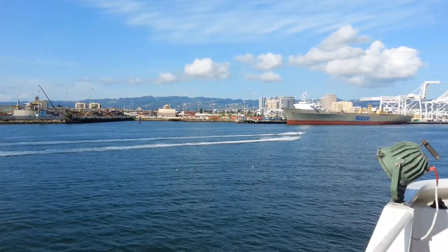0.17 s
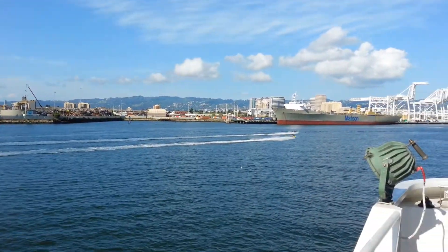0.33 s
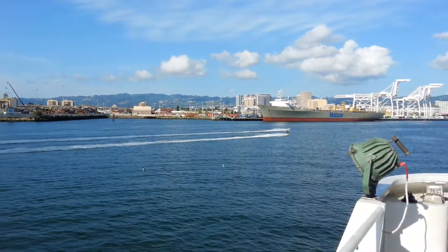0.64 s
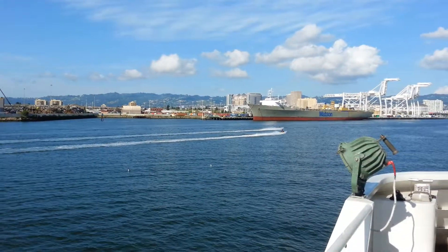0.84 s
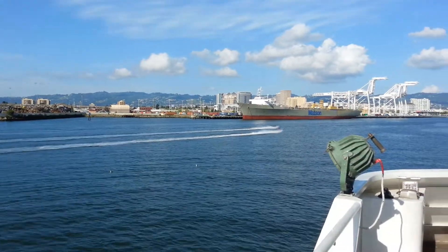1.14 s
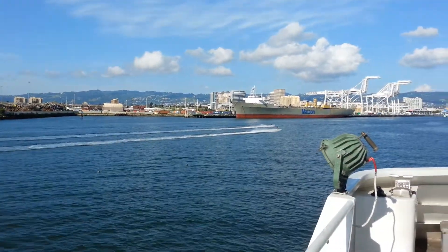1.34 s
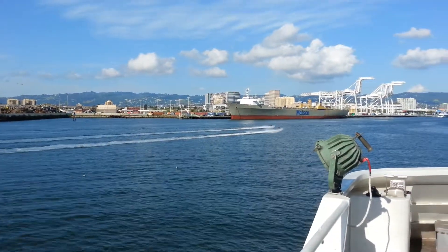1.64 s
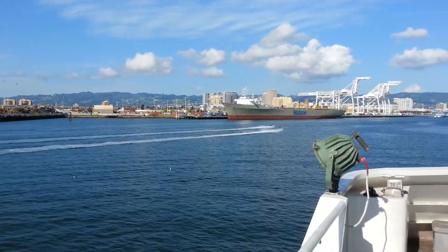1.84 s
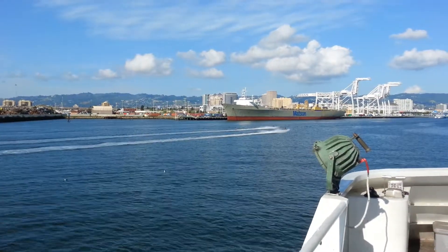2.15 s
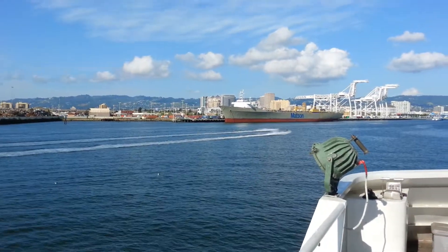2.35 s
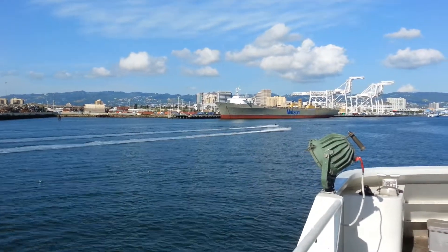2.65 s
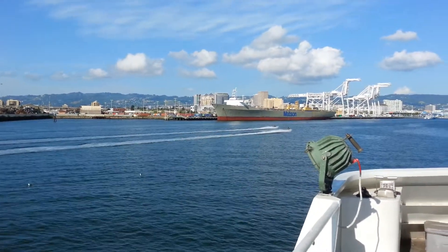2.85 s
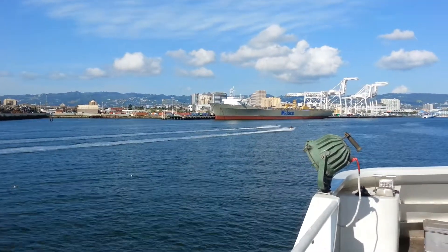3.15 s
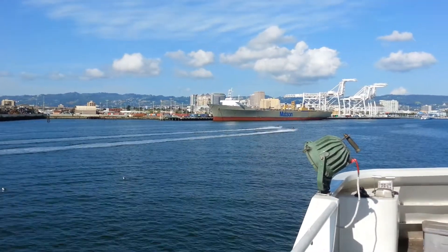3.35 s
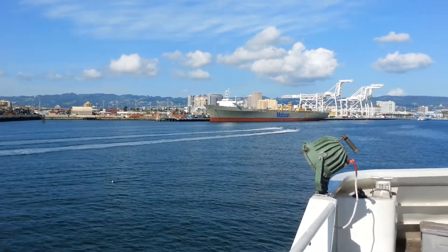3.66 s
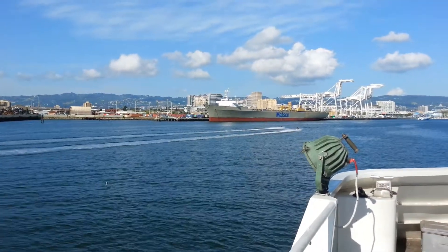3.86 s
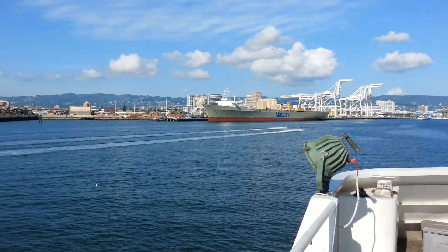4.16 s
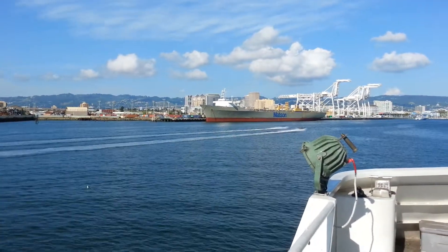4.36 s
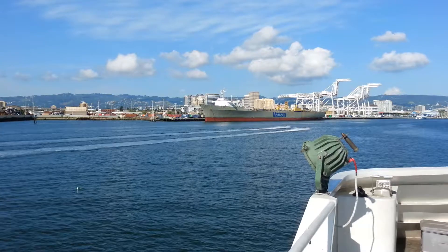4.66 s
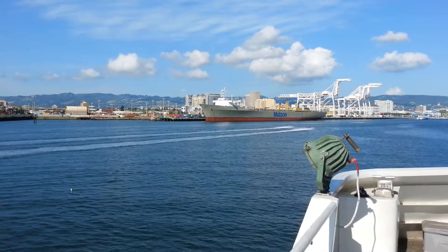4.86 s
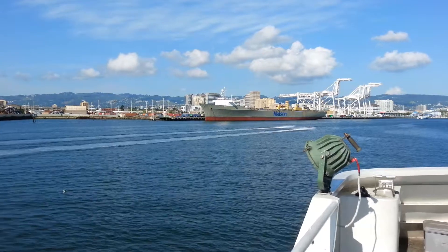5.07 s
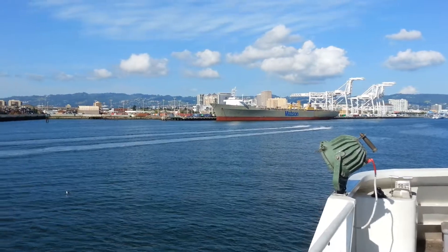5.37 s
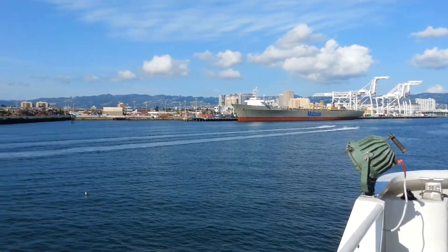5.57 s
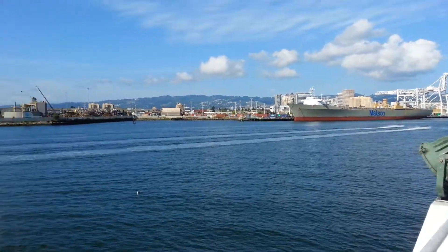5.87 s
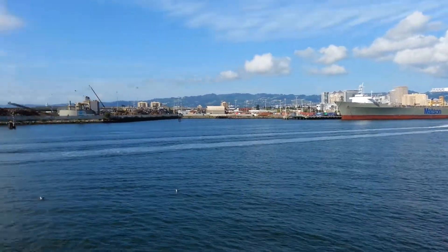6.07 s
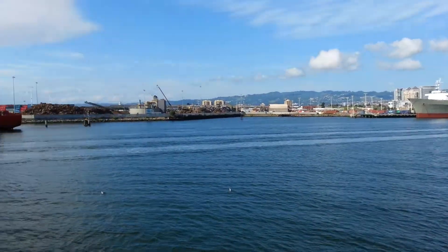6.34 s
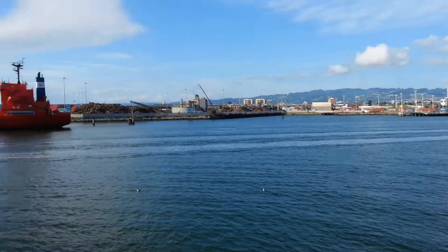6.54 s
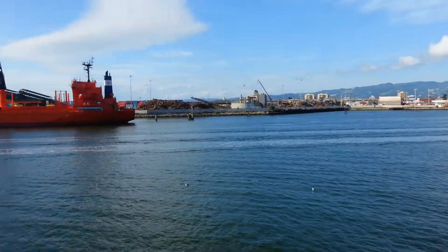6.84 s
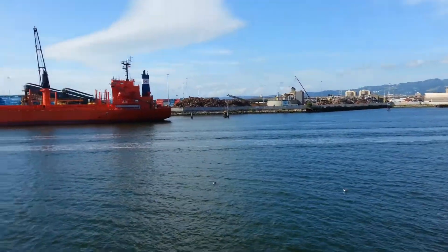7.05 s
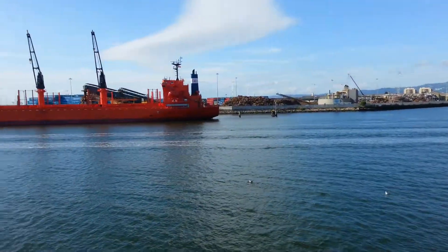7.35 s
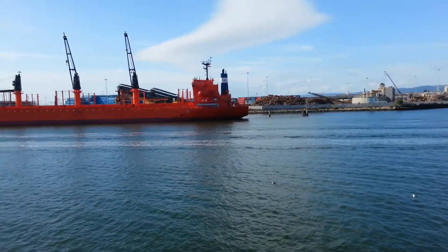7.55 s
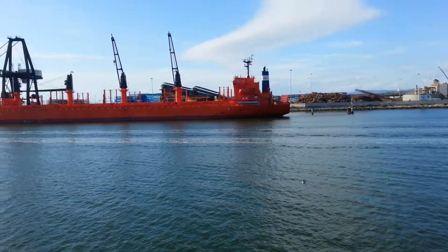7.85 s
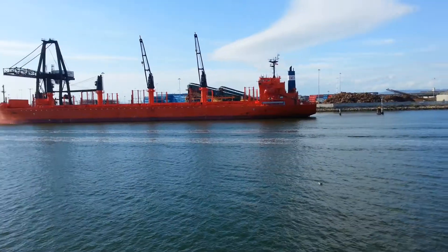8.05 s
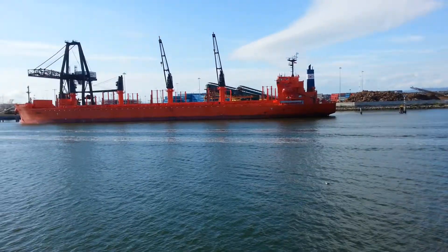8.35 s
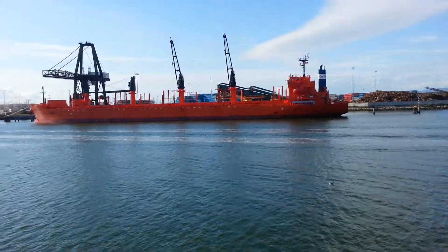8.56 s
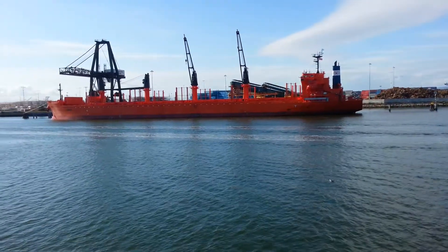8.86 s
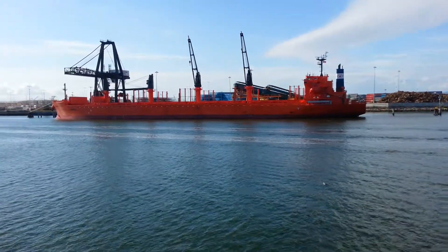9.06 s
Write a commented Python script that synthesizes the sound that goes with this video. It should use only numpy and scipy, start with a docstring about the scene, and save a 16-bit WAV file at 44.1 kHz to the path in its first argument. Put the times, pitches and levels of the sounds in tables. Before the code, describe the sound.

Throughout about nine seconds, a ferry's diesels and generator hold a deep, steady hum that beats and throbs, wrapped in low wind and exhaust roar, with a barely audible thin whine. Bow wash runs mostly on the left, gently rolling; a wave breaks from 0.7 to 2.8 s, with hollow, sliding rushes of churning water densest around 1.3 to 2 s. Softer surges follow near 4.5 and 6.3 s. On the right, foam fizzes finely, with small spits around 2.6, 3.4 to 3.8, 4.7 to 5 and 7.3 s. Isolated bright spray ticks fall close on the right, the clearest at 7.5 s. From 6 to 8 s the stereo microphone swings, swelling the hum and recolouring the water. Thin, raspy, buzzing squeals push out on the left at 7.4 and 8 s, each sagging quickly. A faint distant bird gives one short falling peep at 8.8 s.

```python
"""Open deck of a moving ferry: two diesels and a generator, as combs of sines, beat in a low throb.
Shaped noise makes the roar of wind and exhaust, the bow wash with a few waves on the left, and hollow rushes.
Random bursts and noise make foam fizz on the right; filtered ticks make single drops of spray.
Late on the microphone swings round and the hum grows; thin buzzing partials squeal and a far bird peeps."""
import sys
import numpy as np
from scipy import signal
from scipy.fft import rfft, irfft, next_fast_len
from scipy.io import wavfile
from scipy.ndimage import uniform_filter1d

SR = 44100
rng = np.random.default_rng(int(sys.argv[2]) if len(sys.argv) > 2 else 0)


def to_wav(sig):
    """Store sig (one row per channel, or 1-D mono) as 16-bit WAV at the path in sys.argv[1].

    Samples outside -1..1 are clipped; the rate is SR.
    """
    pcm = np.clip(np.atleast_2d(sig), -1, 1) * 32767
    pcm = np.round(pcm).astype(np.int16)
    wavfile.write(sys.argv[1], SR, pcm.T)  # frames by channels


N = 406161
TIME = np.arange(N) / SR


def diesel(orders, cycle_hz, level_db, drift, waver_db, boom_db=7.0, boom_hz=123, boom_width_hz=9,
           left_db=0.3, smear_cycles=0.27):
    """Unequal cylinders repeat once a working cycle: a comb of lines, which the wind makes waver."""
    cycles = cycle_hz * np.cumsum(1 + drift * wander(0.718)) / SR + rng.random()
    turn = turned()
    out = np.zeros((2, N))
    for order, db in orders:
        hz = order * cycle_hz
        # the swing carries the microphone into a standing wave of the deck
        near_boom = np.exp(-((hz - boom_hz) / boom_width_hz) ** 2)
        boost_db = boom_db * (turn - turn.mean()) * near_boom
        gain = amp(level_db + db + boost_db + waver_db * wander(1.475))
        # the hull smears each thud
        phase = 2 * np.pi * (order * cycles + smear_cycles * rng.standard_normal())
        # reflections part the two sides
        skew = np.arccos(np.clip(read(LIKENESS, hz), -1, 1)) * rng.normal(1.0, 0.87)
        out += gain * np.array([np.sin(phase), np.sin(phase + skew)])
    return np.sqrt(2) * out * amp([[left_db], [-left_db]])  # sine peak to rms


# engine lines: (multiple of the working cycle, relative level [dB])
MAIN_ORDERS = [(6, -49), (9, -41), (10, -41), (11, -43), (13, -34), (14, -35), (15, -31), (16, -43),
               (17, -39), (18, -26), (19, -40), (20, -49), (21, -33), (22, -44), (24, -39), (25, -41),
               (26, -37), (27, -47), (28, -54), (30, -53), (44, -53), (49, -57), (50, -56), (51, -56),
               (54, -47), (57, -58), (81, -62), (96, -60)]
SECOND_ORDERS = [(6, -51), (9, -36), (11, -45), (12, -33), (14, -39), (15, -38), (18, -38), (19, -39),
                 (20, -38), (21, -35), (22, -48), (23, -45), (24, -36), (25, -47), (29, -50), (30, -50),
                 (33, -38), (34, -52), (38, -52), (46, -53), (52, -50)]
GENERATOR_ORDERS = [(4, -43), (5, -48), (8, -33), (9, -39), (12, -40), (14, -49), (24, -51), (25, -46),
                    (26, -49), (27, -54), (28, -51), (29, -57), (30, -59), (31, -59), (32, -54), (33, -55),
                    (34, -59), (35, -58), (36, -52), (38, -61), (39, -58), (40, -62), (47, -63), (49, -62),
                    (52, -63), (60, -63)]
MAIN_HZ, SECOND_HZ, GENERATOR_HZ = 7.2098, 5.5268, 15.1202  # working cycles


def engines():
    """Three machines at unrelated speeds beat together."""
    out = diesel(MAIN_ORDERS, MAIN_HZ, level_db=0.1, drift=.0004, waver_db=.5, smear_cycles=.16)
    out += diesel(SECOND_ORDERS, SECOND_HZ, level_db=0.4, drift=.0003, waver_db=.7)
    out += diesel(GENERATOR_ORDERS, GENERATOR_HZ, level_db=1.3, drift=.0003, waver_db=.6)
    return out


# a faint whine, then a very faint high tone: (frequency [Hz], left level [dB rms], right level [dB rms])
FAINT_TONES = [(2509, -62, -72), (13160, -100, -74)]


def faint_tones():
    """Two sines of constant level and slightly wandering pitch: a faint whine and a very faint high tone."""
    out = np.zeros((2, N))
    for hz, left_db, right_db in FAINT_TONES:
        cycles = np.cumsum(hz * (1 + 0.0026 * wander(12))) / SR
        out += amp([[left_db], [right_db]]) * np.sqrt(2) * np.sin(2 * np.pi * cycles)
    return out


# roar colour before the swing: (frequency [Hz], left density [dB/Hz], right density [dB/Hz])
ROAR_COLOUR = [(15, -92, -91), (35, -83, -77), (80, -57, -52), (115, -56, -55), (130, -45.5, -50),
               (143, -54, -59), (157, -48, -58), (170, -56.5, -59), (201, -54.5, -58.5), (280, -58, -59),
               (358, -58.5, -61.5), (466, -64.5, -68), (780, -66, -65.5), (948, -69, -71),
               (1310, -79.5, -75.5), (3000, -105, -105), (9000, -140, -140)]


def roar():
    """Wind and exhaust turbulence: low coloured noise, slightly patchy."""
    return rush(ROAR_COLOUR, patchy_db=0.5)


# colours before swells and swing: (frequency [Hz], left density [dB/Hz], right density [dB/Hz])
WASH_COLOUR = [(100, -110, -110), (400, -91, -75), (900, -75.5, -76.5), (1310, -69.5, -73.5),
               (1590, -70, -72.5), (2040, -70, -75.5), (2480, -73, -82), (3200, -77, -87), (3850, -81, -92),
               (5170, -85.5, -100), (6200, -93, -98), (9000, -110, -110), (14000, -130, -130)]
SURGE_COLOUR = [(60, -100, -100), (150, -76, -82), (284, -51.5, -52.5), (410, -62, -68), (696, -61.5, -67),
                (895, -75, -79), (1270, -68.5, -68.5), (1520, -59.5, -71), (1900, -70, -65),
                (2200, -65, -74), (2680, -78, -81), (3560, -79, -90), (5000, -96, -100), (9000, -135, -135)]
HISS_COLOUR = [(1980, -115, -125), (2660, -75, -98), (3020, -70, -92), (3350, -75.5, -93), (4070, -83, -88),
               (5500, -105, -110), (9000, -140, -140)]
# waves breaking off the bow: (start [s], length [s], crest gain [dB])
WAVES = [(.68, 2.14, 0.5), (1.31, 0.18, -2), (4.3, 2.3, -15.5), (6.17, 0.71, -5.5), (7.0, 1.3, -17)]
# spells of narrow hiss: (start [s], length [s], crest gain [dB])
HISSES = [(-1.04, 4.25, -1), (-1, 2.1, -6), (3.5, 1.8, -8), (5.5, 4, -7)]
# the wash rises and falls with the slow roll of the boat
WASH_DB, ROLL_DB, ROLL_PERIOD_S, ROLL_CREST_S = -0.48, 0.44, 2.76, 5.04


def water():
    """Coloured noise: gently rolling bow wash, breaking waves, and a narrow hiss."""
    roll = np.cos(2 * np.pi * (TIME - ROLL_CREST_S) / ROLL_PERIOD_S)
    wash = rush(WASH_COLOUR, patchy_db=1.1) * amp(WASH_DB + ROLL_DB * roll)
    waves = rush(SURGE_COLOUR, patchy_db=1.4) * swells(WAVES)
    hiss = rush(HISS_COLOUR, patchy_db=2.0) * swells(HISSES)
    return wash + waves + hiss


# hollow rushes: (start [s], length [s], first frequency [Hz], last frequency [Hz], width [Hz],
#                 left level before swell [dB rms], right level before swell [dB rms])
HOLLOWS = [(.36, .24, 3480, 3530, 500, -46, -60), (.86, 0.28, 3290, 3390, 700, -42, -56),
           (.92, 0.176, 1380, 1450, 400, -38, -50), (1.3, .7, 1565, 1620, 620, -35.5, -49),
           (1.22, .8, 1088, 1030, 230, -40, -45), (1.3, .85, 3043, 3293, 800, -44.5, -59),
           (2.6, 1.3, 3200, 3350, 600, -51, -62), (1.38, 0.118, 1700, 1893, 1400, -34, -38),
           (1.97, 0.1, 1484, 1570, 260, -34, -48), (1.3, .6, 2367, 2280, 330, -39.5, -46),
           (1.35, 0.14, 3150, 3310, 900, -45, -54), (1.35, 1.3, 799.5, 719, 350, -42, -44),
           (2.2, 0.53, 1463, 1440, 180, -47, -56), (2.6, 1.4, 782, 873, 280, -44, -49),
           (4.57, 0.274, 2177, 2244, 450, -40, -48), (5.3, 1.7, 4510, 4760, 900, -52.5, -57),
           (5.4, 1.14, 2050, 2216, 600, -45, -51), (6.25, 0.45, 2160, 2320, 800, -48.5, -54),
           (6.52, 0.19, 1594, 1645, 400, -40, -54), (7.2, 1.6, 1682, 1800, 500, -48, -51)]


def churn():
    """Churning water: hollow rushes of noise in sliding resonances."""
    return gliding_bands(HOLLOWS)


# colours before level and swing: (frequency [Hz], left density [dB/Hz], right density [dB/Hz])
FIZZ_COLOUR = [(2500, -115, -105), (4500, -104, -91), (6280, -99, -84), (7690, -99.5, -78.5),
               (8900, -104, -86), (11430, -109, -93.5), (13000, -116, -100), (14200, -118, -100)]
SPIT_COLOUR = [(3500, -120, -110), (5500, -108, -93), (6730, -101, -84.5), (7500, -101, -83.5),
               (9000, -107, -95), (12000, -116, -100), (14200, -125, -112)]
# sheets of foam beside the hull: (start [s], length [s], crest level re steady fizz [dB], added as power)
FOAM_SHEETS = [(-.4, 2.6, -2), (3.25, 1.7, -1), (4.5, 1.1, -1), (5.65, 1.27, 0.5), (7.0, 1.8, -3),
               (8.0, 2.2, -7)]
# clumps of bubbles bursting together: (middle [s], relative level [dB])
SPITS = [(2.64, 4), (3.39, 7), (3.47, 9), (3.8, 9), (4.69, 8), (4.78, 5), (4.97, 3), (7.22, 5), (7.37, 6)]
FIZZ_DB, SPIT_S = -3, 0.026


def foam(bursts_per_s=230, burst_db=-8, flicker_db=0.58):
    """Countless tiny bubbles fizz, more with each sheet of foam; nearer ones burst as ticks and spits."""
    sizes = amp(3.2 * np.minimum(rng.exponential(1, (2, N)), 3.2))
    signs = rng.choice([-1, 1], (2, N))
    happens = rng.random((2, N)) < bursts_per_s / SR
    bursts = evened(sizes * signs * happens)
    ticks = amp(burst_db) * np.sqrt(SR / 2) * tinted(bursts, FIZZ_COLOUR)
    fizz = rush(FIZZ_COLOUR, patchy_db=0.9) + ticks
    sheets = fizz * np.sqrt(1 + swells(FOAM_SHEETS) ** 2)
    spit_power = sum(amp(db) ** 2 * np.exp(-((TIME - s) / SPIT_S) ** 2) for s, db in SPITS)
    spits = rush(SPIT_COLOUR, patchy_db=3.0) * np.sqrt(spit_power)
    return (sheets + spits) * amp(FIZZ_DB + flicker_db * wander(20))


# the squeal's two pushes: (start [s], length [s], delay from one partial to the next [s])
SQUEALS = [(7.38, .28, 0), (8.0, .47, .02)]
# left partials before sag: (multiple of the pitch, first push level [dB rms], second push level [dB rms])
SQUEAL_PARTIALS = [(12, -48.5, -46.5), (13, -45.5, -42.5), (14, -54, -44), (15, -50, -52), (16, -58, -52),
                   (17, -63, -55), (18, -70, -59)]
# rasp bands: (start [s], length [s], first frequency [Hz], last frequency [Hz], width [Hz],
#              left level before swell [dB rms], right level before swell [dB rms])
SQUEAL_RASP = [(7.1, 1.55, 3550, 3680, 750, -46.3, -57), (7.65, .95, 4250, 4400, 900, -52, -58),
               (7.64, .34, 3470, 3470, 40, -47.5, -58), (7.62, .5, 3720, 3650, 400, -48, -59),
               (7.86, .34, 3380, 3500, 170, -41, -52), (7.92, .25, 3180, 3225, 90, -45.5, -56),
               (7.97, .1, 2600, 2400, 250, -43, -54)]
SQUEAL_HZ = 266.9
SQUEAL_ATTACK_S, SQUEAL_RELEASE_S, SQUEAL_SAG_DB_PER_S = .07, .05, 17


def squeal(jitter=.0012, waver_db=1.8, rough=.4, rough_hz=34, right_db=-11):
    """High partials of a near-steady pitch start fast, sag and flutter over a dry noise rasp."""
    cycles = np.cumsum(SQUEAL_HZ * (1 + jitter * wander(18))) / SR
    slow = signal.butter(2, rough_hz, fs=SR, output="sos")
    buzz = np.zeros(N)
    for rank, (multiple, *levels) in enumerate(SQUEAL_PARTIALS):
        gain = np.zeros(N)
        for (start, length, delay), db in zip(SQUEALS, levels):
            age = np.clip(TIME - start - rank * delay, 0, length)
            attack = np.minimum(age / SQUEAL_ATTACK_S, 1)
            release = np.clip((start + length - TIME) / SQUEAL_RELEASE_S, 0, 1)
            gain += attack * release * amp(db - SQUEAL_SAG_DB_PER_S * age)
        # slow noise in phase and in quadrature roughens the partial
        along, across = rough * evened(signal.sosfilt(slow, rng.standard_normal((2, N))))
        phase = 2 * np.pi * (multiple * cycles + rng.random())
        partial = (1 + along) * np.sin(phase) + across * np.cos(phase)
        buzz += gain * evened(amp(waver_db * wander(12)) * partial)
    return buzz * amp([[0], [right_db]]) + gliding_bands(SQUEAL_RASP)


# drops of spray: (time [s], relative peak level [dB])
DROPS = [(1.7574, -32), (2.9856, -28.5), (5.2057, -26), (6.1549, -30), (7.0943, -30), (7.5022, -15.5)]


def spray(level_db=-.7, left_db=-15, decay_s=.0006):
    """Single drops land beside the microphone: decaying noise, band-passed to a very short bright tick."""
    t = np.arange(400) / SR
    out = np.zeros(N)
    bright = signal.butter(4, [7000, 14500], "bandpass", fs=SR, output="sos")
    for s, db in DROPS:
        tick = signal.sosfilt(bright, rng.standard_normal(len(t)) * np.exp(-t / decay_s))
        out[round(s * SR):][:len(t)] += amp(db + level_db) * tick / abs(tick).max()
    return out * amp([[left_db], [0]])


PEEP_START_S, PEEP_LENGTH_S, PEEP_DB, PEEP_HZ, PEEP_FALL_HZ = 8.797, .105, -41, 3040, 520


def bird(right_db=-11):
    """One short sine whistle from far off, its pitch falling ever faster."""
    age = np.clip((TIME - PEEP_START_S) / PEEP_LENGTH_S, 0, 1)
    whistle = np.sin(2 * np.pi * np.cumsum(PEEP_HZ - PEEP_FALL_HZ * age ** 2) / SR)
    return evened(whistle) * np.sin(np.pi * age) ** 2 * amp(PEEP_DB) * amp([[0], [right_db]])


# (frequency [Hz], left-right likeness [0-1])
LIKENESS = [(60, 0.97), (150, 1), (300, 0.93), (630, 0.72), (1300, 0.41), (2000, 0.49), (3000, 0.0044),
            (7000, 0)]
# slanting sound reaches the left port later: (frequency [Hz], lag [rad])
PORT_LAG = [(30, 0.17), (300, 0.34), (780, 0.85), (1100, 1.7), (1460, 4.23), (1750, 4.3), (2240, 5.17)]


def rush(colour, patchy_db):
    """Two-sided noise of a given colour, with short patches of turbulence."""
    hz, _, z = signal.stft(rng.standard_normal((2, N)), SR, nperseg=2048, noverlap=1536)
    same = np.clip(read(LIKENESS, hz), -1, 1)[:, None]
    lag = np.exp(1j * read(PORT_LAG, hz))[:, None]
    z[1] = same * z[0] * lag + np.sqrt(1 - same ** 2) * z[1]
    patches = uniform_filter1d(rng.standard_normal(z.shape[1:]), size=24, axis=0)  # along frequency
    patches = evened(uniform_filter1d(patches, size=8, axis=1))  # along time
    level_db = np.array([read(colour, hz, 1), read(colour, hz, 2)])[:, :, None] + patchy_db * patches
    noise = signal.istft(z * amp(level_db), nperseg=2048, noverlap=1536)[1][:, :N]
    return np.sqrt(SR / 2) * noise  # density per Hz


def gliding_bands(rows):
    """Each row is one swell of noise in a resonance that slides as it sounds."""
    out = np.zeros((2, N))
    for start, length, from_hz, to_hz, width_hz, left_db, right_db in rows:
        first = round(start * SR)
        age = (TIME[first:][:round(length * SR)] - start) / length
        noise = rng.standard_normal((2, 2, len(age)))
        narrow = signal.butter(2, width_hz / 2, fs=SR, output="sos")
        fuzz = signal.sosfilt(narrow, noise[0] + 1j * noise[1])
        cycles = np.cumsum(from_hz + (to_hz - from_hz) * age) / SR
        band = (fuzz * np.exp(2j * np.pi * cycles)).real
        out[:, first:first + len(age)] += evened(band) * swell(age) * amp([[left_db], [right_db]])
    return out


SWELL_SKEW, SWELL_POWER = 0.71, 1.25


def swell(age):
    """A fast rise to the crest and a slow ebb, as age runs from 0 to 1."""
    return abs(np.sin(np.pi * np.clip(age, 0, 1) ** SWELL_SKEW)) ** SWELL_POWER


def swells(rows):
    """Gain of a series of swells, added as power."""
    return np.sqrt(sum((amp(db) * swell((TIME - start) / length)) ** 2 for start, length, db in rows))


# one swing of the microphone, after a slight early drift; shares are of a full swing
TURN_START_S, TURN_LENGTH_S, TURN_SHARE = 6, 1.97, 0.73
DRIFT_START_S, DRIFT_LENGTH_S, DRIFT_SHARE = 1.4, 1.7, .08


def turned():
    """Share of a full swing the microphone has made."""
    drift = DRIFT_SHARE * eased(DRIFT_START_S, DRIFT_LENGTH_S)
    return np.clip(drift + TURN_SHARE * eased(TURN_START_S, TURN_LENGTH_S), 0, 1)


def eased(start, length):
    """A smooth move from 0 to 1."""
    return np.sin(np.pi / 2 * np.clip((TIME - start) / length, 0, 1)) ** 2


def tinted(x, colour):
    """Filters each side by its column of a colour table."""
    size = next_fast_len(N)
    hz = np.fft.rfftfreq(size, 1 / SR)
    gain = amp([read(colour, hz, 1), read(colour, hz, 2)])
    return irfft(rfft(x, size) * gain, size)[:, :N]


def wander(rate_hz):
    """Smooth random drift of rms 1: ten sines of random phase, none faster than the rate."""
    t = np.linspace(0, TIME[-1], 400)
    rates_hz = rate_hz * np.geomspace(.1, 1, 10)
    slow = sum(np.sin(2 * np.pi * (f * t + rng.random())) for f in rates_hz)
    return np.interp(TIME, t, evened(slow))


def read(rows, hz, column=1):
    """One column of a spectrum on a log-frequency axis."""
    rows = np.array(rows, float)
    return np.interp(np.log(hz + 1), np.log(rows[:, 0] + 1), rows[:, column])


def evened(x):
    """Scales to rms 1."""
    return x / np.sqrt(np.mean(x ** 2) + 1e-20)


def amp(db):
    """Decibels to gain."""
    return 10 ** (np.asarray(db) / 20)


# what a full swing does to the air and water: (frequency [Hz], left gain [dB], right gain [dB])
TURN_COLOUR = [(150, -6, -2), (368, 4, 2.5), (600, 2, -2.5), (1200, -3, -4.5), (1800, -1, -0.5),
               (2500, 3, 1.5), (4840, 1, 6), (8350, 9.5, 2.5), (10500, -13, 6.5), (14000, -10, 7)]


def scene():
    """Engines under the roar, with the water around; the swing recolours roar, water and foam."""
    around = roar() + water() + foam()
    turn = turned()
    around = (1 - turn) * around + turn * tinted(around, TURN_COLOUR)
    return engines() + faint_tones() + around + churn() + squeal() + spray() + bird()


EDGE_HZ = 14700


def record(dry):
    """The recorder's band limit: a linear-phase low-pass."""
    lowpass = signal.firwin(511, EDGE_HZ, window=("kaiser", 9), fs=SR)
    return signal.oaconvolve(dry, lowpass[None], "same")


dry = scene()
out = record(dry)
to_wav(out)
```